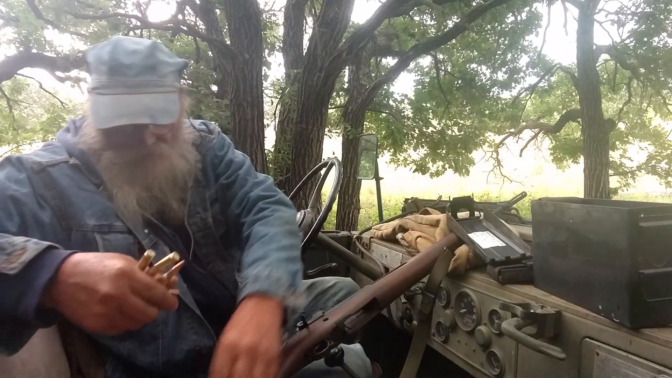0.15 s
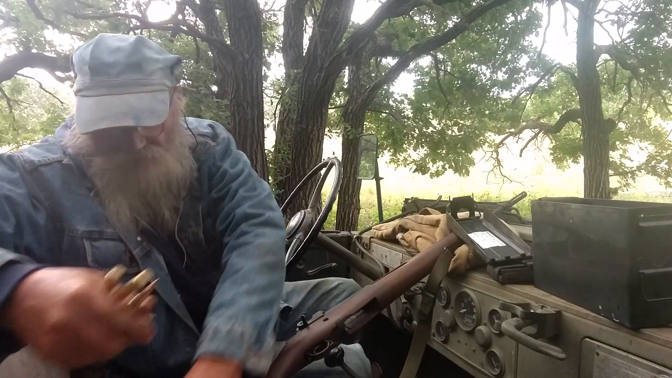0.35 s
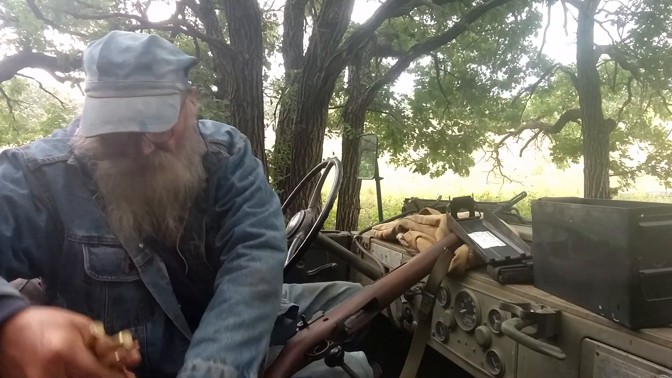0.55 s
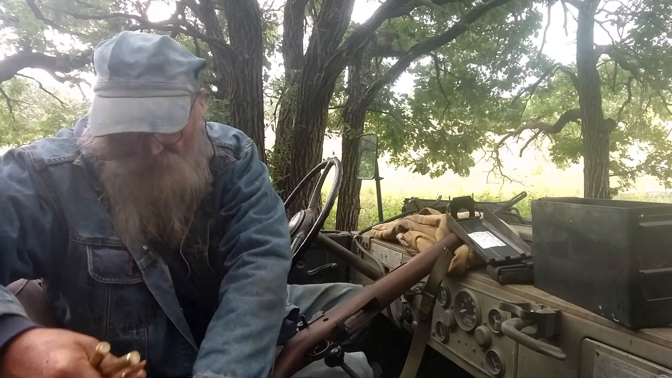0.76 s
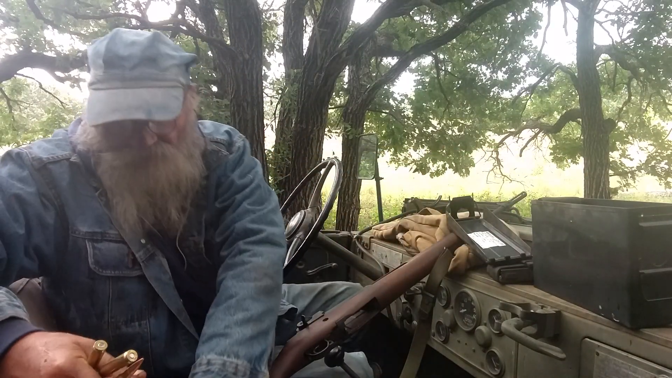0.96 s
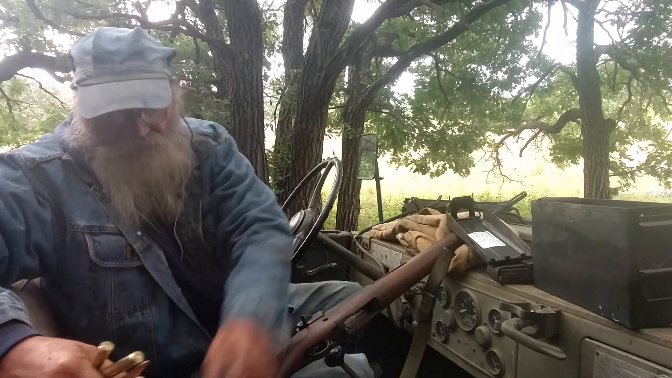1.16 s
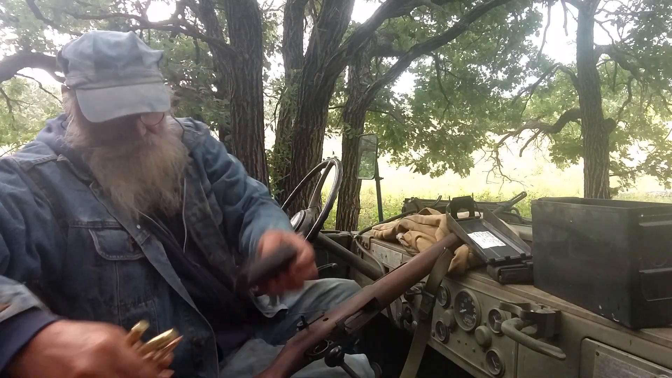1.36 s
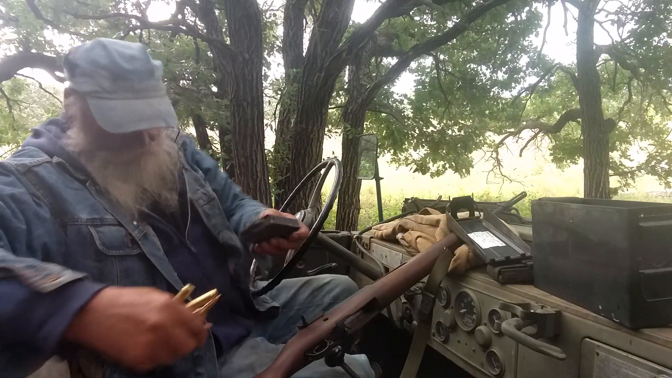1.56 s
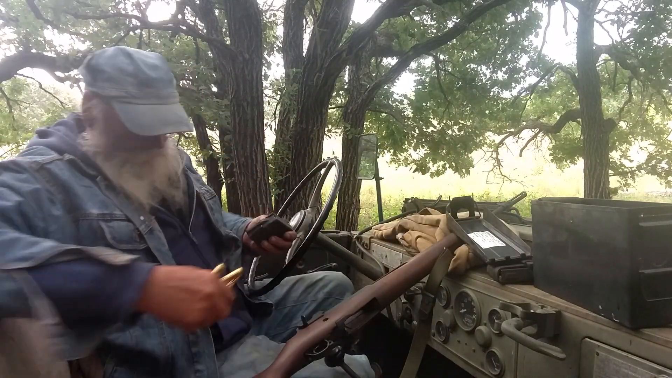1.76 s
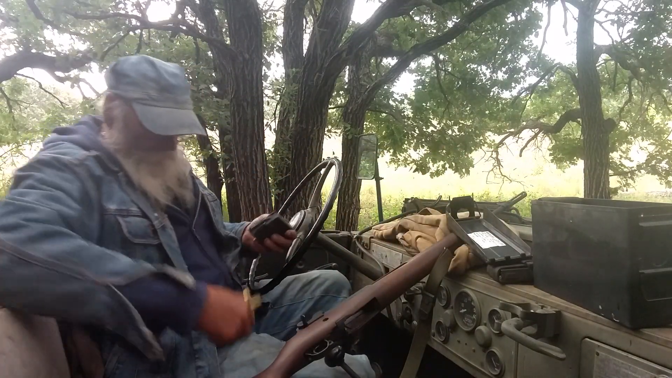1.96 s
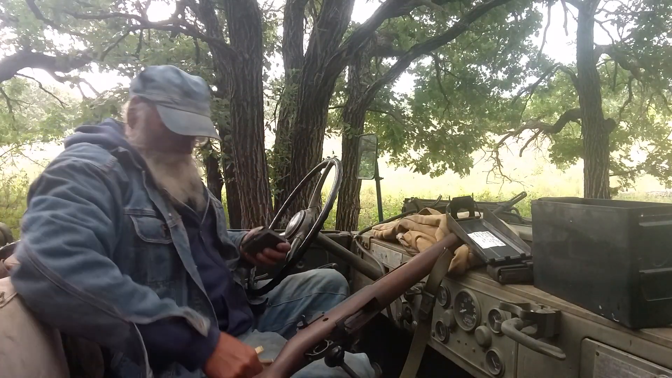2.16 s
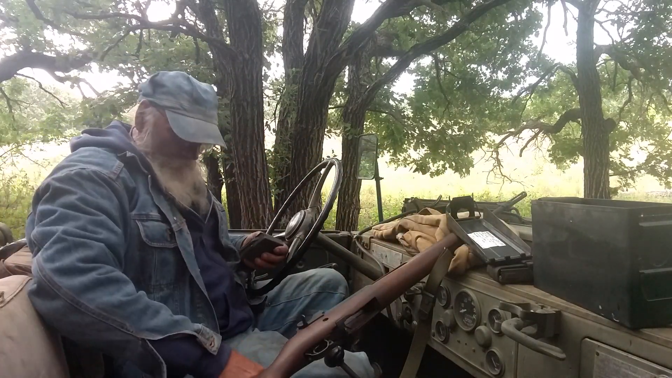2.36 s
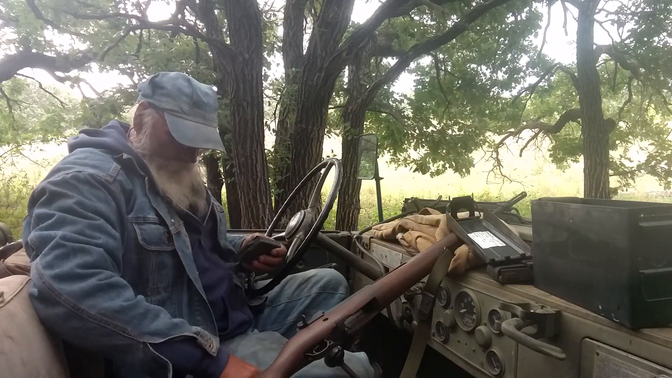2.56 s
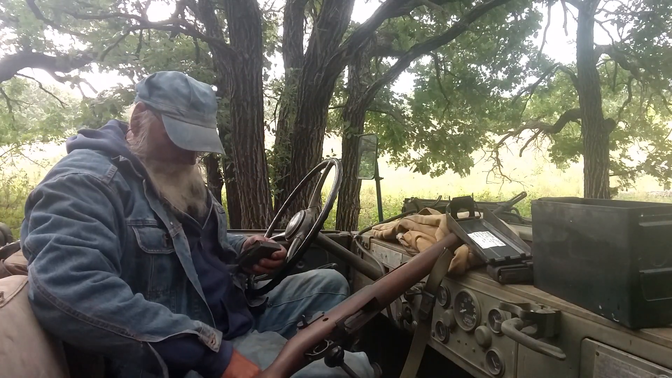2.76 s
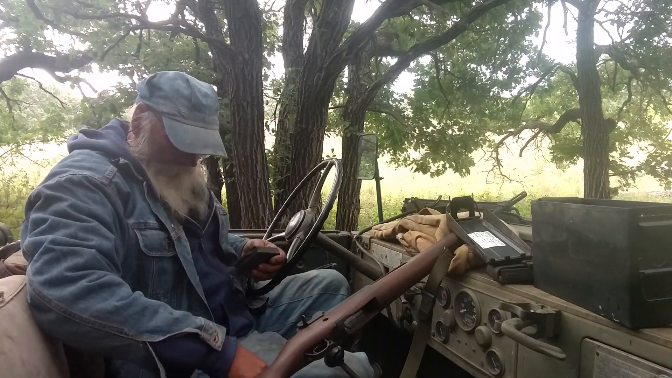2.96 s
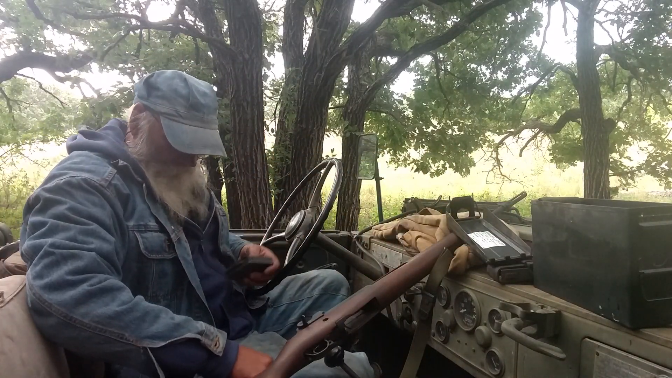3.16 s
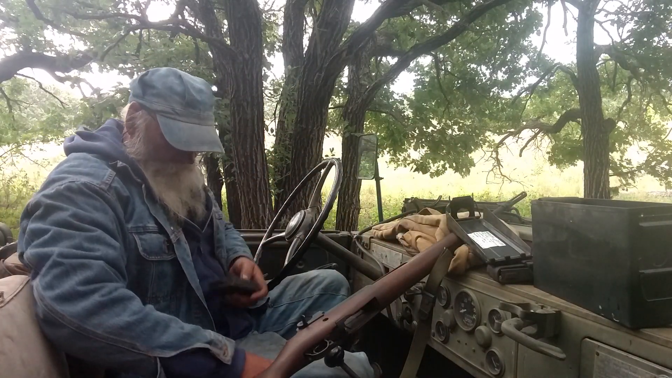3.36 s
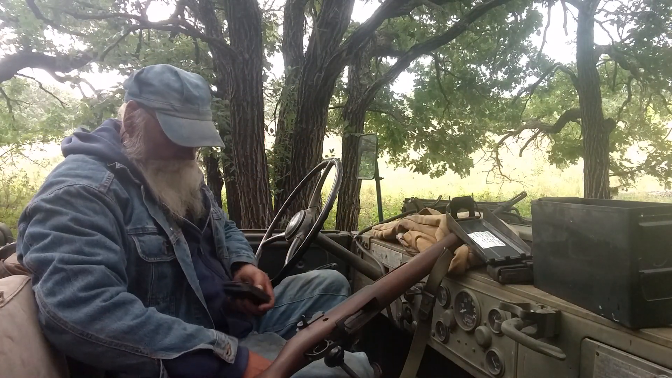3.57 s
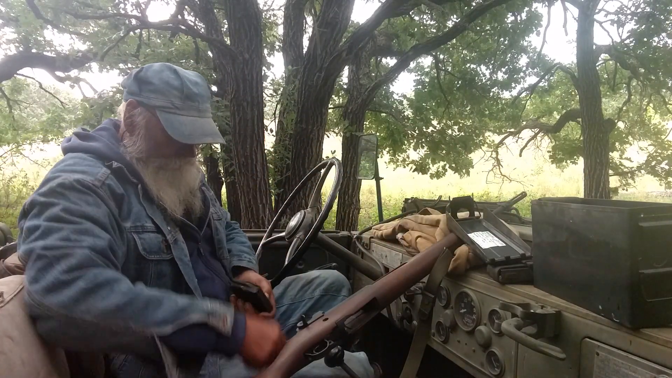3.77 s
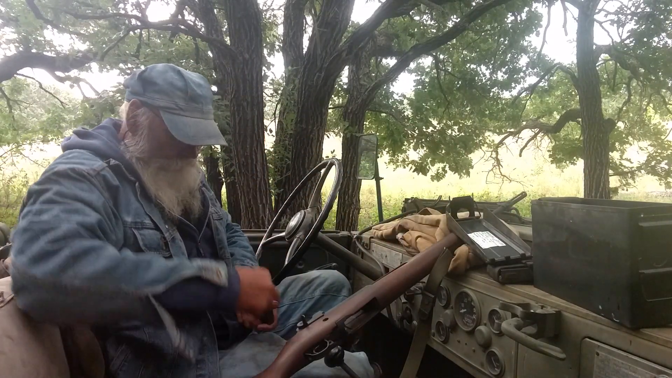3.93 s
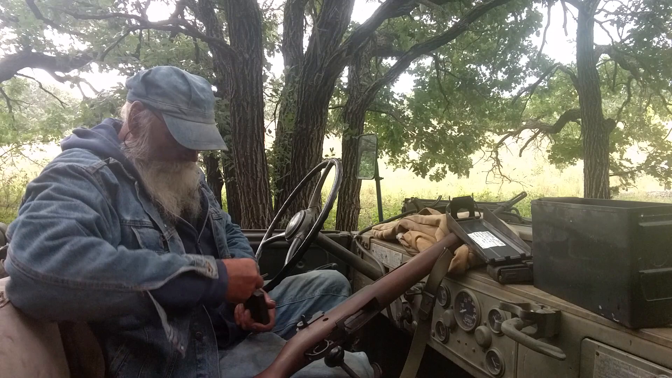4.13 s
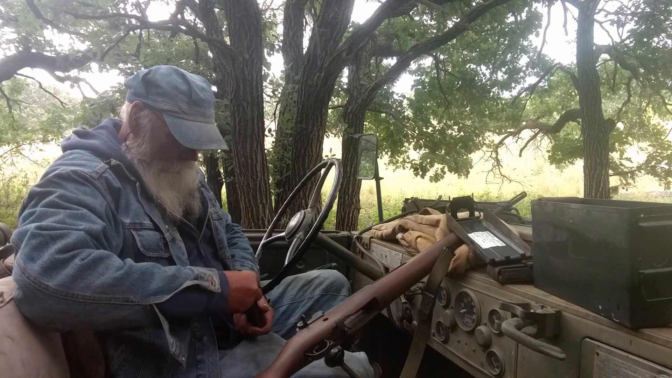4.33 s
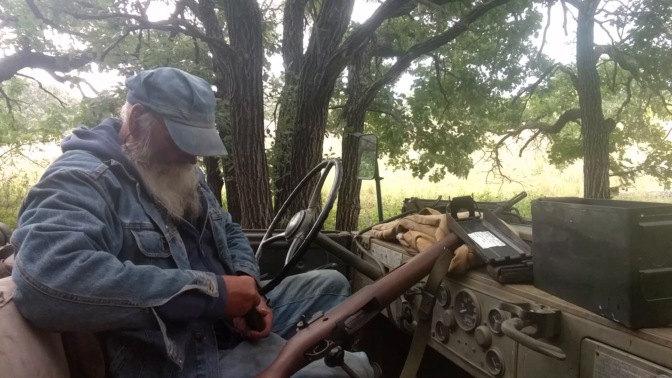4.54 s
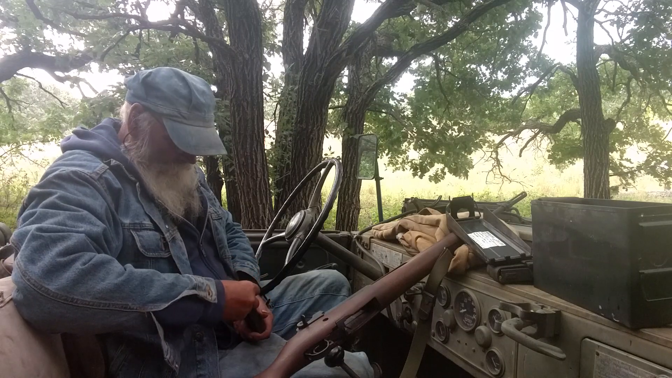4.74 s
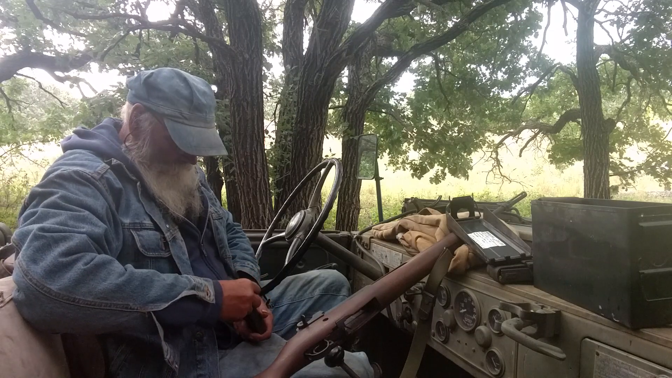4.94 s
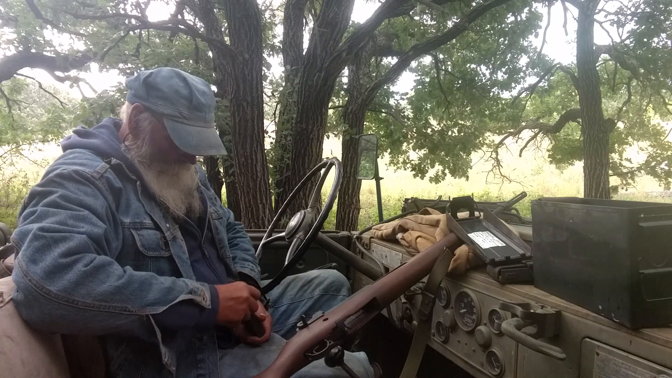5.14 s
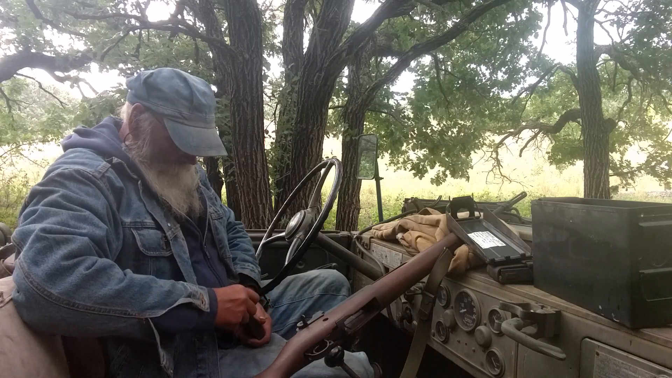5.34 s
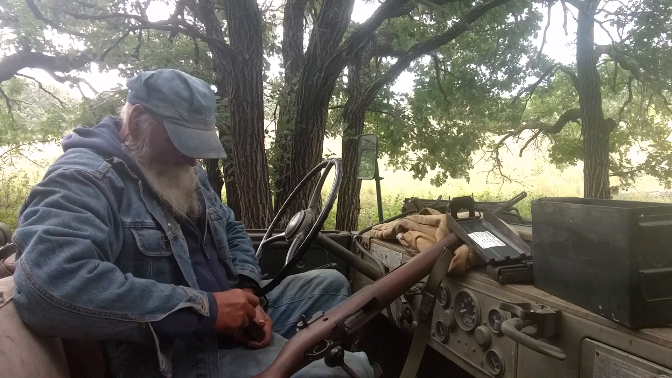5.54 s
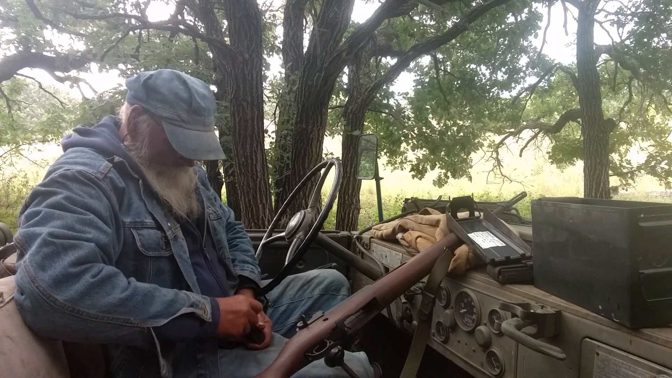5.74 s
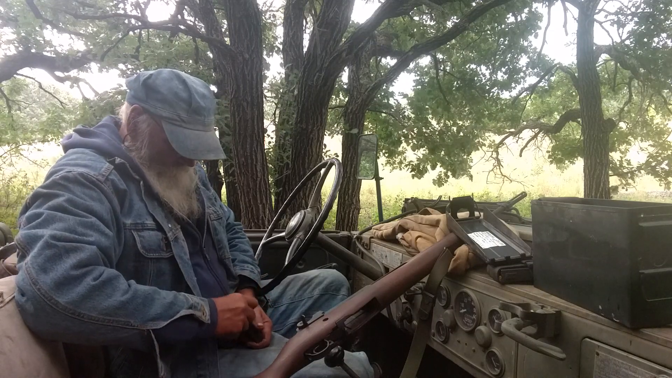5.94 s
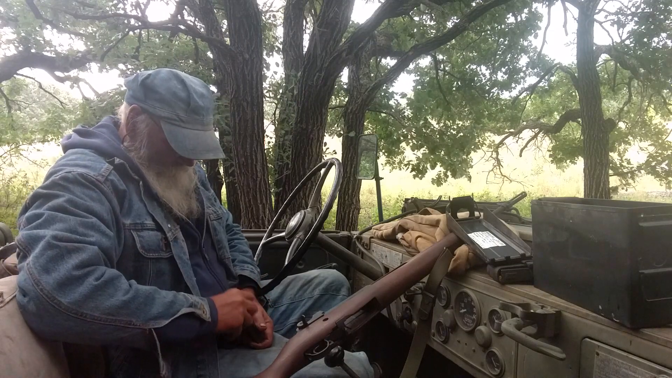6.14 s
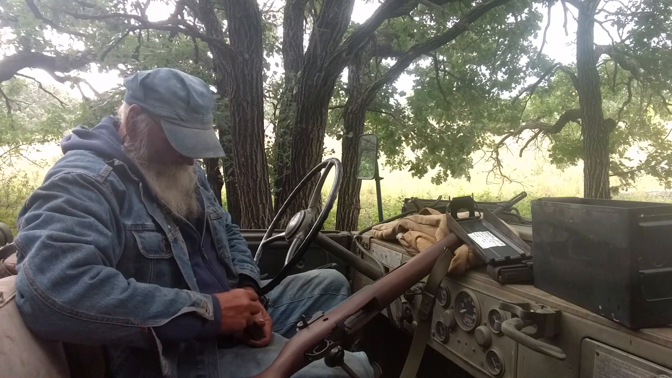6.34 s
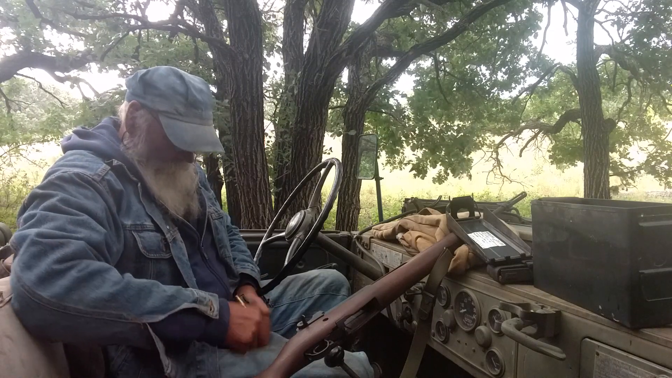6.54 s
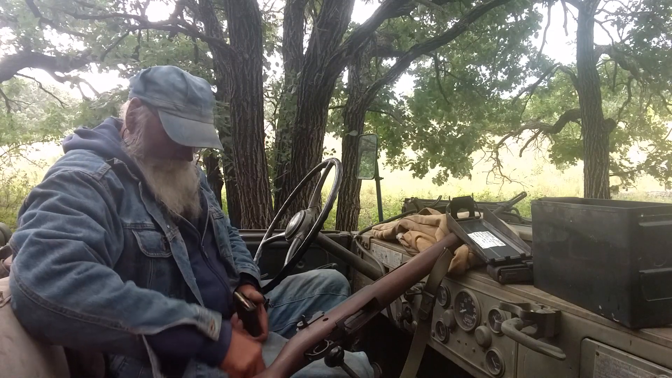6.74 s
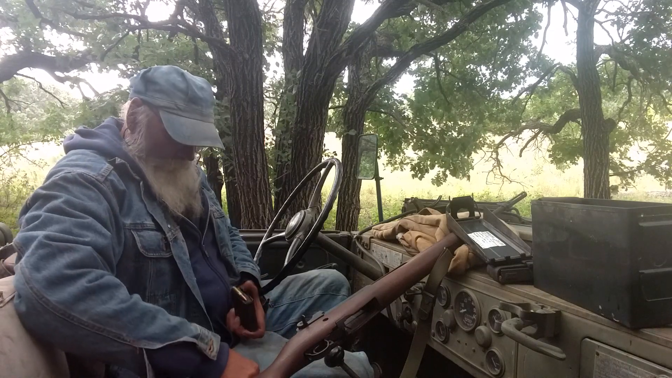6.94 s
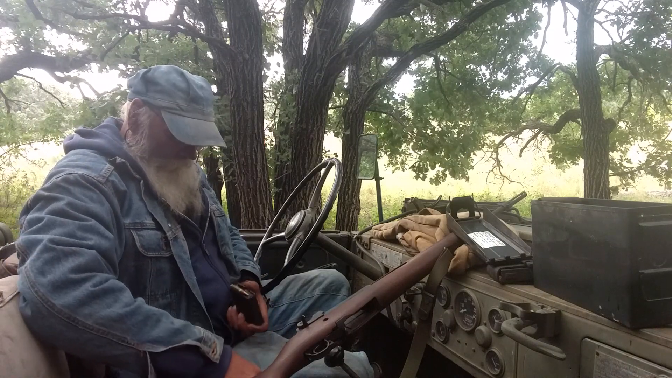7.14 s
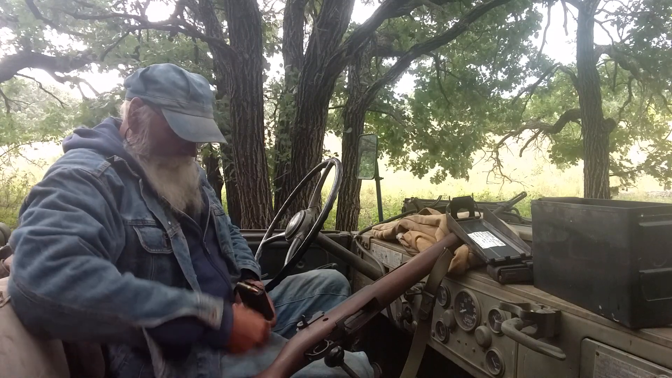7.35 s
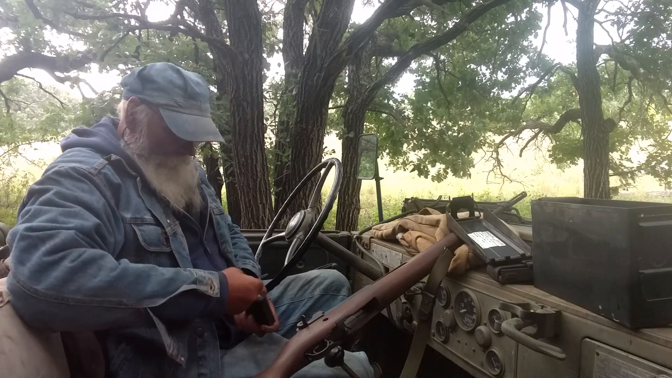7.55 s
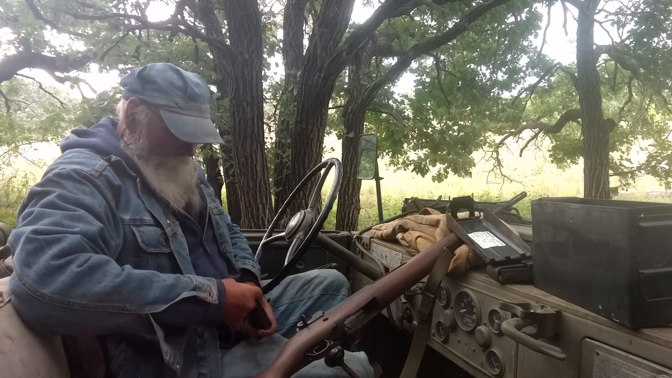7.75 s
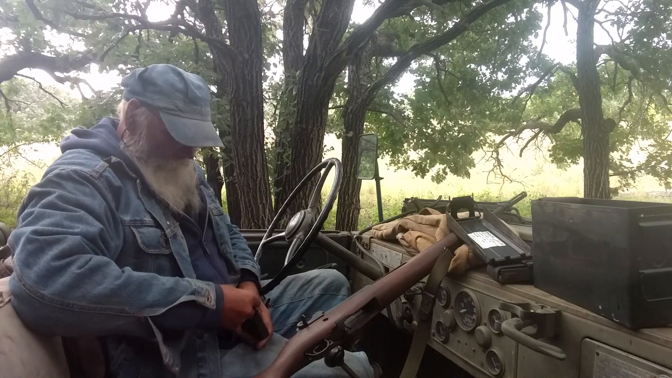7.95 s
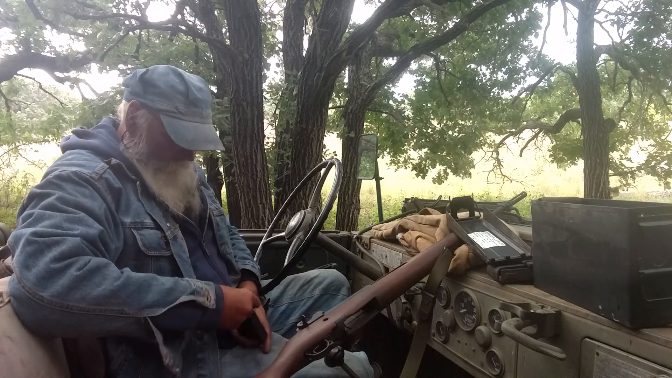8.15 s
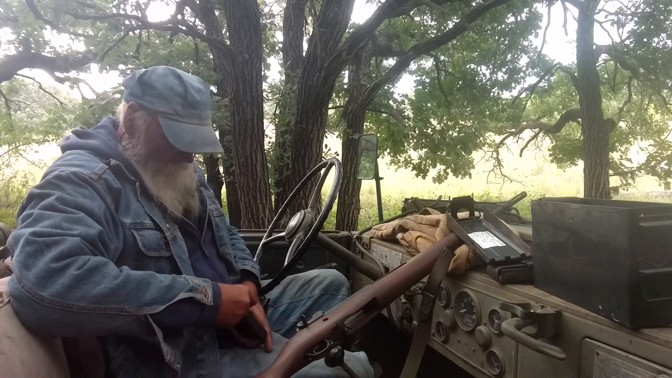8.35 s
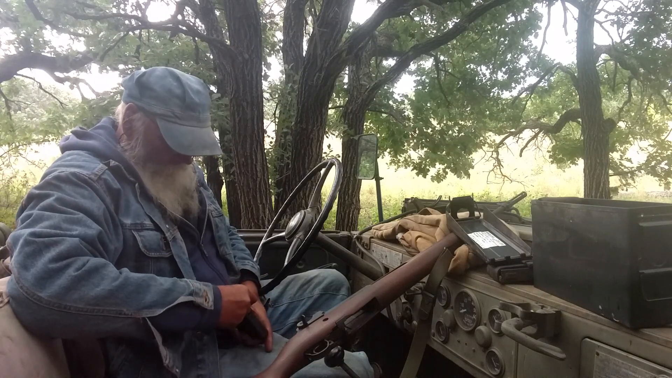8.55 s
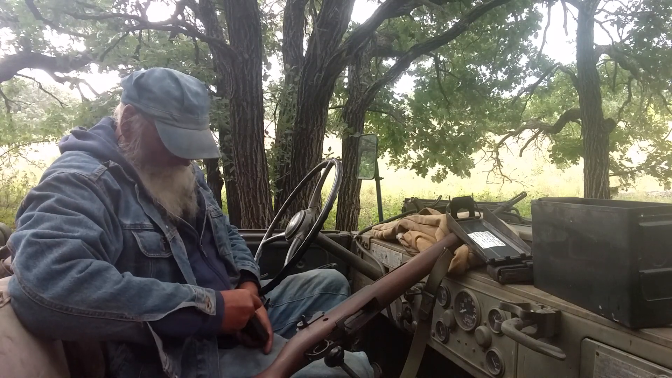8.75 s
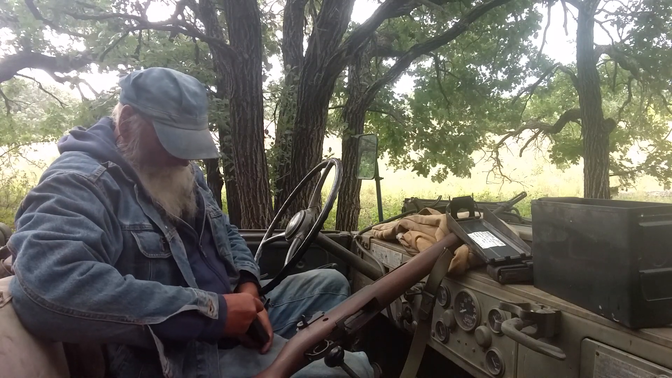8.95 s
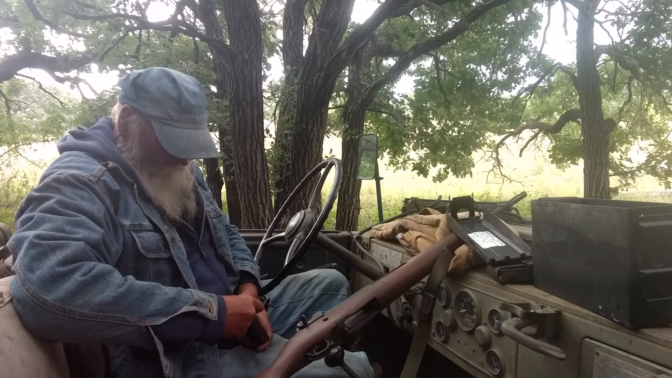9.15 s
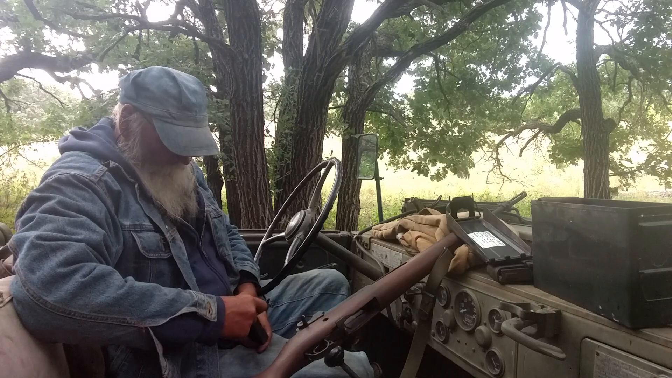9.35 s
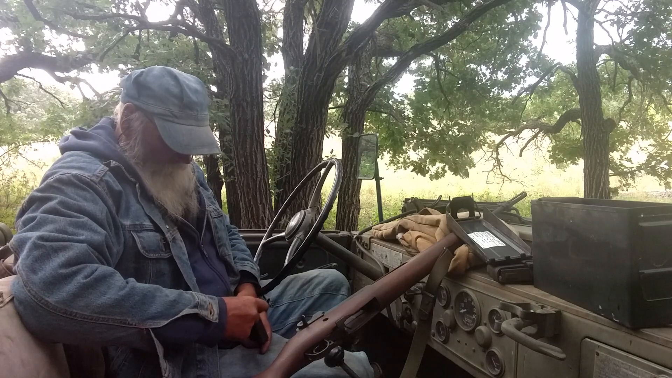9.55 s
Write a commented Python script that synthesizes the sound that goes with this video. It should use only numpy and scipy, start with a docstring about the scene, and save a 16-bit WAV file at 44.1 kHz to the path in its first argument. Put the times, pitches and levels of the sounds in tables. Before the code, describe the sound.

A seated person loads a steel magazine with brass cartridges. First a cluster of rattling clacks with jacket rustle and seat rubbing, then thin bright ticks of cases touching, then short damped snaps in irregular groups with quiet gaps. Recorded close in the open air, wide stereo, with soft smooth foliage hiss and brief muffled wind buffets.

```python
"""Loading a magazine under trees

Outdoors, close to two capsules, hands rattle brass cartridges and press them into a sheet-steel magazine:
knocks, clacks and clicks are damped tones and noise through resonances. Clothing and seat rustle as shaped
noise, brief sines hum, leaves hiss far off, and puffs of wind buffet mainly the second capsule.
Subtracting the delayed other capsule widens the image; a gain control ducks after the loudest snaps."""
import sys
import numpy as np
from scipy import signal
from scipy.fft import rfft, irfft, next_fast_len
from scipy.io import wavfile
from scipy.ndimage import uniform_filter1d, map_coordinates

SR = 44100
rng = np.random.default_rng(int(sys.argv[2]) if len(sys.argv) > 2 else 0)


def generate_wav(signal):
    """Clip the signal to [-1, 1] and save it as 16-bit WAV at the path in sys.argv[1]."""
    frames = np.transpose(np.atleast_2d(signal))
    scaled = np.clip(frames, -1, 1) * 32767
    pcm = np.round(scaled).astype(np.int16)
    wavfile.write(sys.argv[1], SR, pcm)


def convert_level_to_amplitude(level_db):
    """Map a level in decibels to its linear amplitude factor."""
    exponent = np.asarray(level_db, float) / 20
    return 10 ** exponent


N = 427769
CONTACT_TIME = np.arange(4096) / SR  # seconds within one contact
# Contact levels are rms over the first 9 ms at the capsules, before scattering and the recorder.

# Contacts on the hand-held magazine:
# (time [s], knock level [dB], upper knock level [dB], sheet clack level [dB], brass click level [dB])
SNAPS = [(4.288, -28, -39, -32, -34), (4.405, -44, -61, -49, -54), (4.445, -36, -41, -40, -34),
         (4.527, -39, -34, -43, -60), (4.735, -37, -45, -30, -42), (4.754, -41, -43, -36, -54),
         (4.831, -51, -53, -43, -61), (5.132, -45, -65, -62, -64), (5.686, -43, -60, -60, -59),
         (5.692, -24, -44, -44, -57), (5.703, -26, -37, -47, -30), (5.706, -25.5, -47, -37, -37),
         (5.761, -46, -57, -60, -55), (6.103, -37, -49, -41, -48), (6.124, -20, -20, -28, -27.5),
         (6.264, -27, -46, -60.5, -47), (7.659, -34, -43, -35, -34), (7.725, -33.5, -39.5, -35, -38.5),
         (8.516, -34, -43.5, -45, -51), (9.336, -45, -44, -53, -64)]
# Pitch of the knock, moving as the magazine fills and the grip changes: (time [s], frequency [Hz])
KNOCK_PITCH = [(4.29, 800), (4.76, 810), (5.13, 680), (5.7, 660), (6.12, 675), (7.66, 710), (7.73, 775),
               (8.5, 693), (9.3, 620)]
UPPER_KNOCK_HZ = 1030  # second hollow mode of the magazine


def snaps(out):
    """A short push sounds two hollow modes of the hand-damped magazine, along with its sheet and the brass."""
    t = CONTACT_TIME
    for s, knock_db, upper_db, clack_db, click_db in SNAPS:
        rise_s = 0.00084 + 0.00007 * np.clip(knock_db - click_db, 0, 25)  # a dull contact pushes slowly
        push = (1 - np.exp(-t / rise_s)) ** 2 * np.exp(-(t / 0.0034) ** 1.42)
        knock_hz = np.interp(s, *np.transpose(KNOCK_PITCH))
        knock = level(from_hands(push * np.sin(2 * np.pi * knock_hz * t)), knock_db)
        upper = level(from_hands(push * np.sin(2 * np.pi * UPPER_KNOCK_HZ * t)), upper_db)
        add_contact(out, s, knock + upper + sheet_and_brass(clack_db, click_db))


# The magazine pulled from the floor well, bumping:
# (time [s], body level [dB], body frequency [Hz], sheet clack level [dB], brass click level [dB])
BUMPS = [(.12, -41.5, 520, -44, -56), (0.508, -40.5, 910, -25.5, -24.5), (.701, -25, 830, -35, -32.5),
         (.723, -28.5, 1050, -28.5, -34), (0.772, -34, 1210, -26, -34), (.789, -50, 804, -54, -60),
         (.889, -28, 1420, -23, -41), (.894, -28.5, 1200, -26.5, -45), (.918, -42.5, 900, -47, -54),
         (0.933, -37, 1150, -48, -46), (.943, -42, 980, -54, -45), (0.969, -31.5, 900, -51, -50),
         (.978, -23.5, 1170, -23.5, -24.5), (0.996, -35.5, 700, -51, -54), (1.029, -41.5, 970, -37, -52)]
# Seat frame modes, also played by rustle(): (frequency [Hz], width [Hz], relative level [dB])
SEAT = [(241, 95, -0.5), (357, 41, 4), (438, 88, -1.5)]


def bumps(out):
    """Three broad body modes of the loose magazine, a thud in the seat frame, sheet and brass."""
    for s, body_db, body_hz, clack_db, click_db in BUMPS:
        modes = [(0.58 * body_hz, 0.23 * body_hz, -6),
                 (body_hz, 0.21 * body_hz, 0),
                 (1.42 * body_hz, 0.2 * body_hz, -3)]
        body = scrape(modes, body_db, 0.032, alike=0.99)
        # the seat frame feels a share of each bump, low ones most
        thud_db = -18 + 0.66 * body_db - 5 * np.log2(body_hz / 1000)
        thud = scrape(SEAT, thud_db, 0.019, alike=0.97)
        add_contact(out, s, body + thud + sheet_and_brass(clack_db, click_db))


# Loose cartridges touching in the hand: (time [s], ring level [dB], tick level [dB], top tick level [dB])
JINGLES = [(2.51, -38, -51, -48), (2.628, -56, -55, -55), (2.679, -38.5, -55, -60), (2.692, -36, -50, -38),
           (2.706, -42, -47, -53), (2.724, -45, -52, -60), (2.813, -50, -44, -50), (2.846, -45, -47, -45),
           (2.875, -48, -49, -50), (2.922, -41.5, -43.5, -50), (2.942, -46, -41, -42),
           (7.676, -43, -56, -62)]
# Free ring of a case: (frequency [Hz], width [Hz], relative level [dB])
CASE = [(5730, 43, 14), (5400, 130, -3), (6140, 260, -6)]
# Case necks, for the top tick: (frequency [Hz], width [Hz], relative level [dB])
NECKS = [(9400, 780, -3), (11200, 520, 1), (12400, 700, -2), (13500, 810, -7)]


def jingles(out):
    """Touching cases ring narrowly, with ticks through the brass and neck modes."""
    for s, ring_db, tick_db, top_db in JINGLES:
        ring = scrape(CASE, ring_db, 0.0091)
        tick = scrape(BRASS, tick_db, 0.009, alike=0.58)
        top_tick = scrape(NECKS, top_db, 0.014, alike=0.63)
        add_contact(out, s, ring + tick + top_tick)


# Walls and cases that ring on when a contact leaves them free:
# (frequency [Hz], 60 dB decay time [s], list of contacts (time [s], level [dB]))
RINGS = [(1644, 0.042, [(4.289, -33.5), (4.446, -36), (9.337, -52)]), (2070, .015, [(5.703, -27.5),
         (.978, -47)]), (2370, .038, [(7.726, -31.5)]), (2494, 0.078, [(.889, -33), (4.735, -31),
         (4.754, -35), (6.104, -54.5)]), (2863, .018, [(.508, -23.5)]), (3530, .03, [(4.617, -40),
         (7.726, -39)]), (3780, 0.02, [(.978, -29)]), (4190, 0.034, [(4.735, -39)]),
         (5610, .04, [(7.659, -35.5), (2.691, -45), (2.846, -49), (2.922, -48)]),
         (6330, 0.059, [(4.289, -42.5)]), (6660, 0.12, [(5.705, -44.5)])]


def rings(out):
    """Decaying sines with a randomly wandering phase: a loosely held part rings unevenly."""
    t = CONTACT_TIME
    for hz, t60, contacts in RINGS:
        for s, db in contacts:
            phase = 2 * np.pi * hz * t + np.cumsum(rng.normal(0, 0.097, len(t)))
            envelope = (1 - np.exp(-t / 0.0026)) * convert_level_to_amplitude(-60 * t / t60)
            add_contact(out, s, level(from_hands(envelope * np.sin(phase)), db))


def cartridges():
    """Every contact of magazine and cartridges, laid out in time."""
    out = np.zeros((2, N + SR))  # room for the last tails
    snaps(out)
    bumps(out)
    jingles(out)
    rings(out)
    return out[:, :N]


# Magazine walls: (frequency [Hz], width [Hz], relative level [dB])
SHEET = [(1590, 1100, -5), (2050, 83, -23), (2400, 410, 7), (2920, 1100, 4.5)]
# Cartridge cases, also played by jingles(): (frequency [Hz], width [Hz], relative level [dB])
BRASS = [(3430, 830, -1.5), (4150, 570, 2), (5230, 1550, -1.5), (5900, 510, -1), (6100, 460, -5.5),
         (7870, 1200, -7)]
# Case rims: (frequency [Hz], width [Hz], relative level [dB])
RIMS = [(7940, 1100, 7), (9730, 1400, 4), (12200, 1900, -3.5), (13300, 500, -23.5)]


def sheet_and_brass(clack_db, click_db):
    """Sheet, brass and, weaker than the brass, the case rims sound together."""
    rim_db = click_db - 5 + 0.55 * min(click_db - clack_db, 0)
    clack = scrape(SHEET, clack_db, 0.02)
    click = scrape(BRASS, click_db, 0.023, alike=0.71)
    return clack + click + scrape(RIMS, rim_db, 0.014, alike=0.27)


def scrape(modes, db, t60, alike=0.5):
    """A rough contact: decaying noise through modes, partly alike at the two capsules."""
    envelope = (1 - np.exp(-CONTACT_TIME / 0.0004)) * convert_level_to_amplitude(-60 * CONTACT_TIME / t60)
    same, *own = rng.standard_normal((3, len(CONTACT_TIME))) * envelope
    pair = alike * from_hands(same) + np.sqrt(1 - min(alike, 1) ** 2) * np.array(own)
    struck = [(hz, width, g + rng.normal(0, 2.5)) for hz, width, g in modes]  # new strengths each time
    return level(filtered(pair, resonances(struck)), db)


def add_contact(out, s, sound):
    """Lays a contact at time s; nearby steel panels and trunks scatter it briefly, most around 3 to 6 kHz."""
    t = CONTACT_TIME
    tail = rng.standard_normal(sound.shape) * convert_level_to_amplitude(-60 * t / 0.071) * (1 - np.exp(-t / 0.00064))
    tail = tail / np.linalg.norm(tail[0])
    scatter_db = [(500, -9), (1200, -9), (3000, 0), (6000, -2), (12000, -9)]  # (frequency [Hz], level [dB])
    tail = filtered(tail, lambda hz: convert_level_to_amplitude(along(scatter_db, hz)))
    echo = signal.fftconvolve(sound, tail, axes=1)[:, :len(t)]
    out[:, round(s * SR):][:, :len(t)] += sound + convert_level_to_amplitude(-14) * echo


# The body shifts on the seat:
# (start [s], length [s], cloth level [dB], cloth hollow [Hz], seat rub level [dB])
SHIFTS = [(0.078, .17, -48, 494, -48.5), (0.436, .07, -53, 795, -52), (.73, .08, -49.5, 890, -58),
          (0.91, 0.092, -43, 1070, -43.5), (1.302, 0.2, -60, 600, -54.5), (1.652, .02, -48, 940, -50),
          (1.71, .2, -42.5, 900, -45), (1.975, 0.027, -52, 800, -42), (2.092, 0.078, -60, 700, -40.5),
          (2.23, .02, -55, 600, -46.5), (2.88, .06, -54, 600, -57), (3.6, 0.28, -72, 600, -54.5),
          (4.303, 0.29, -53.5, 800, -63), (7.9, 1.0, -59, 600, -59.5), (9.137, .02, -47, 880, -59),
          (9.252, 0.52, -58.5, 616, -57.5)]
SHIFT_RISE, SHIFT_FALL = 0.032, 0.04  # seconds per 10 dB
REST_CLOTH_DB, REST_SEAT_DB = -67.5, -68.5  # sitting still


def rustle():
    """Cloth drags on the seat: clumped noise in a moving hollow, a dry fringe above, the seat frame below."""
    cloth = np.array([swell(s, length, db, SHIFT_RISE, SHIFT_FALL) for s, length, db, _, _ in SHIFTS])
    seat = sum(swell(s, length, db, SHIFT_RISE, SHIFT_FALL) for s, length, _, _, db in SHIFTS)

    hz, t, spectra = signal.stft(rng.standard_normal((2, N)), SR, nperseg=1024)
    loudest = cloth[:, np.minimum((t * SR).astype(int), N - 1)].argmax(axis=0)
    hollow_hz = np.array([row[3] for row in SHIFTS])[loudest]  # the loudest shift sets the hollow
    hz = hz[:, None]
    off = np.log((hz + 1) / hollow_hz)
    hollow = np.exp(-0.5 * (off / 0.19) ** 2) + 0.48 * np.exp(-0.5 * (off / 1.09) ** 2)
    shape = hollow + 0.24 * np.exp(-hz / 4000)
    shape = shape / np.sqrt(np.mean(shape ** 2, axis=0))
    same, own = signal.istft(spectra * shape, SR, nperseg=1024)[1][:, :N]

    # short waves reach the capsules by different paths: the first adds noise of its own
    own = filtered(own, lambda f: np.clip(along([(1000, 0.065), (2500, 1.0)], f), 0, 1))
    drag = from_hands(same) + [[1], [0]] * own
    grain_db = 2.3 * wobble(35) + 2 * wobble(120)  # stick and slip of the weave
    cloth_sound = (cloth.sum(axis=0) + convert_level_to_amplitude(REST_CLOTH_DB)) * unit(drag * convert_level_to_amplitude(grain_db))

    rub = filtered(rng.standard_normal(N), resonances(SEAT))
    rub = unit(rub * convert_level_to_amplitude(2.7 * wobble(25)))
    return cloth_sound + from_hands((seat + convert_level_to_amplitude(REST_SEAT_DB)) * rub)


# Short low hums: (centre time [s], length [s], frequency [Hz], peak level [dB])
HUMS = [(0.282, 0.074, 131, -37.5), (1.73, 0.047, 218, -40), (2.724, 0.033, 199.4, -40),
        (8.875, 0.27, 199, -44)]


def hums():
    """Brief low sines on the hands' side that swell, waver in phase and fade."""
    t = np.arange(N) / SR
    waver = 0.38 * wobble(14)
    total = np.zeros(N)
    for s, length, hz, db in HUMS:
        envelope = np.exp(-(2 * (t - s) / length) ** 4)
        total += convert_level_to_amplitude(db) * envelope * np.sin(2 * np.pi * hz * t + waver)
    return from_hands(total)


# Wind puffs at the exposed second capsule: (start [s], length [s], level [dB])
PUFFS = [(1.41, .02, -43), (1.48, 0.073, -35.5), (4.982, 0.067, -36), (5.17, 0.15, -32),
         (5.388, 0.044, -31), (7.69, .02, -36.5), (7.763, 0.015, -29.5), (8.07, .05, -39.5), (9.5, .2, -56)]
# Spectrum of the buffeting: (frequency [Hz], relative level per Hz [dB])
BUFFET = [(15, -34), (40, 0), (65, -4.5), (100, -1.5), (140, -8), (190, -20.5), (300, -30), (600, -65)]
PUFF_RISE, PUFF_FALL, CALM_DB = 0.02, 0.032, -59  # seconds per 10 dB twice; level between puffs


def puffs():
    """Lumpy low noise buffets the exposed second capsule and reaches the first only weakly."""
    low = filtered(rng.standard_normal(N), lambda hz: convert_level_to_amplitude(along(BUFFET, hz)))
    gust = sum(swell(*puff, PUFF_RISE, PUFF_FALL) for puff in PUFFS) + convert_level_to_amplitude(CALM_DB)
    return gust * unit(low * convert_level_to_amplitude(1.7 * wobble(25))) * [[0.12], [1]]


# Mean level of the leaf hiss: (time [s], level [dB])
BREEZE = [(0, -44), (2, -43.5), (3.5, -43.5), (5.3, -45), (7, -42.5), (8.5, -44.5), (9.7, -44.5)]
# Spectrum of the leaf hiss: (frequency [Hz], relative level per Hz [dB])
LEAVES = [(20, -16), (40, -17), (70, -0.5), (200, 0), (500, -7), (1300, -15.5), (2500, -14.5),
          (4000, -13.5), (7000, -19.5), (10000, -26.5), (13000, -33), (15000, -39.5), (15800, -54),
          (17000, -70)]
# Likeness of the hiss in both capsules: (frequency [Hz], correlation [0..1])
ALIKE = [(100, 0.71), (350, 0.76), (800, 0.55), (1300, 0.017), (3000, 0.017)]
# Leaf hiss, first capsule over second: (frequency [Hz], level [dB])
FACING = [(500, 0.5), (2000, 2.5), (10000, 3.5)]


def leaves():
    """Smooth far hiss of shaped noise, alike in both capsules only for long waves."""
    turn = lambda hz: np.arccos(np.clip(along(ALIKE, hz), 0, 1)) / 2  # mixing angle giving that likeness
    mix = lambda hz: convert_level_to_amplitude(along(LEAVES, hz)) * [np.cos(turn(hz)), np.sin(turn(hz))]
    middle, side = filtered(rng.standard_normal((2, N)), mix)
    first = filtered(delayed(middle + side, 3), lambda hz: convert_level_to_amplitude(along(FACING, hz)))
    breeze_db = np.interp(np.arange(N) / SR, *np.transpose(BREEZE))
    return convert_level_to_amplitude(breeze_db + 1.2 * wobble(3.31)) * unit(np.array([first, middle - side]))


def unit(x):
    """Scaled to rms 1."""
    return x / np.sqrt(np.mean(x ** 2) + 1e-20)


def level(x, db):
    """Scaled to rms db over the first 9 ms."""
    return convert_level_to_amplitude(db) * x / np.sqrt(np.mean(x[..., :round(0.009 * SR)] ** 2))


def swell(s, length, db, rise, fall):
    """Gain that rises to db at s, holds for length, then falls; rise and fall in seconds per 10 dB."""
    t = np.arange(N) / SR - s
    return convert_level_to_amplitude(db - 10 * np.maximum(np.maximum(-t / rise, (t - length) / fall), 0))


def wobble(rate):
    """A smooth random curve, rate knots a second."""
    return map_coordinates(rng.standard_normal(int(N * rate / SR) + 4), [np.arange(N) * rate / SR])


def along(points, hz):
    """(frequency [Hz], value) points joined on a log frequency axis."""
    f, v = np.transpose(points)
    return np.interp(np.log(hz + 1), np.log(f + 1), v)


def filtered(x, response):
    """x times a response of frequency."""
    m = next_fast_len(x.shape[-1] + 4096)
    return irfft(rfft(x, m) * response(np.fft.rfftfreq(m, 1 / SR)), m)[..., :x.shape[-1]]


def resonances(modes):
    """Causal response of (frequency [Hz], width [Hz], level [dB]) modes, with alternating signs."""
    def response(f):
        total = 0
        for k, (centre, width, db) in enumerate(modes):
            damping = 1j * f * width
            total = total + (-1) ** k * convert_level_to_amplitude(db) * damping / (centre * centre - f * f + damping)
        return total
    return response


def delayed(x, count):
    """x arriving count samples later."""
    return np.pad(x, (count, 0))[:len(x)]


def from_hands(shared):
    """A sound from the hands' side: it reaches the second capsule 7 samples before the first."""
    return np.array([delayed(shared, 7), shared])


def scene():
    """All sources at the two capsules."""
    return cartridges() + rustle() + hums() + puffs() + leaves()


def gain_control(x, over_db=-19, share=0.65, release_db=8, start_db=-6):
    """Loud peaks pull the gain down within some 70 ms; it climbs back at release_db dB per second."""
    power = uniform_filter1d((x ** 2).max(axis=0), size=132)  # 3 ms mean of the louder side
    peak_db = 10 * np.log10(np.abs(power) + 1e-12)
    need_db = -share * np.maximum(peak_db - over_db, 0)
    need_db[0] = start_db  # the gain begins already pulled down
    climb = release_db * np.arange(N) / SR
    gain_db = np.minimum(climb + np.minimum.accumulate(need_db - climb), 0)
    # origin makes the average look back only
    return x * convert_level_to_amplitude(uniform_filter1d(gain_db, size=3001, origin=1500, mode="nearest"))


def band_limit(x):
    """A steep low-pass at the top of the band."""
    return signal.sosfilt(signal.butter(12, 16640, fs=SR, output="sos"), x)


# First capsule over second, split evenly between them: (frequency [Hz], level [dB])
CAPSULES = [(60, 3), (300, 0.5), (1000, 7), (2000, -0.5), (4000, -3.5), (10000, 1.5)]
# Share of the delayed other capsule subtracted: (frequency [Hz], share [0..1])
CROSS = [(60, 0.9), (1300, 0.95), (2600, 0.78), (5200, 0.53), (9000, 0.53), (13000, 0.47)]
TOP_HZ, WIDEN = 16500, 17  # upper limit of the capsules; cross-subtraction delay in samples


def record(dry):
    """Unequal capsules, each side minus a share of the delayed other, then gain control."""
    tone = lambda hz: convert_level_to_amplitude(np.outer([0.5, -0.5], along(CAPSULES, hz))) * (hz < TOP_HZ)
    first, second = filtered(dry, tone)
    other = np.array([delayed(second, WIDEN), delayed(first, WIDEN)])
    other = filtered(other, lambda hz: np.clip(along(CROSS, hz), 0, 1))
    mix = gain_control(np.array([first, second]) - other)
    return band_limit(mix)


dry = scene()
out = record(dry)
generate_wav(out)
```